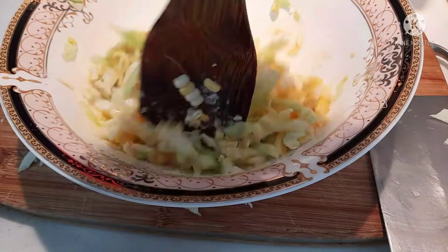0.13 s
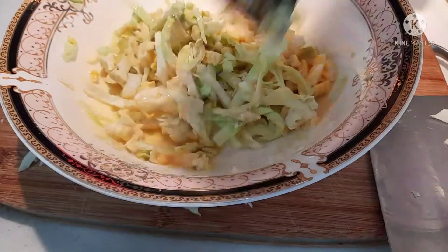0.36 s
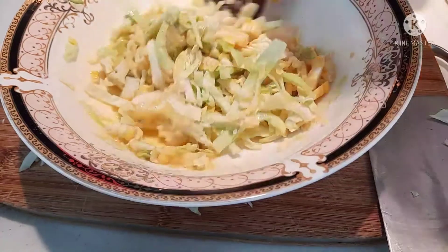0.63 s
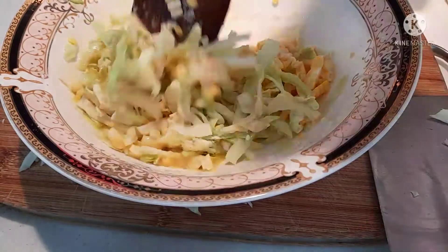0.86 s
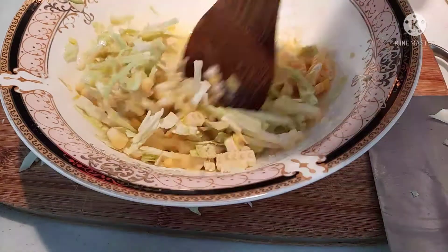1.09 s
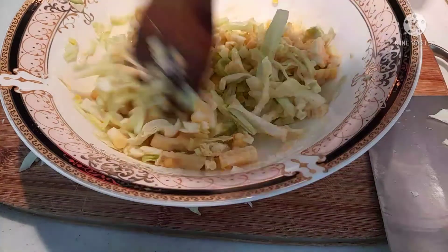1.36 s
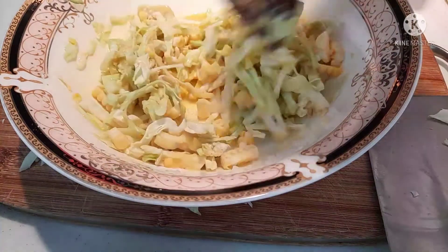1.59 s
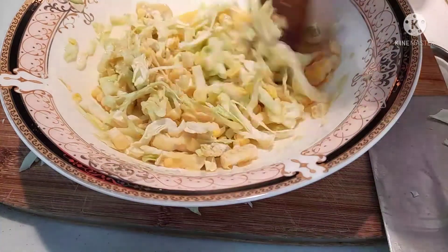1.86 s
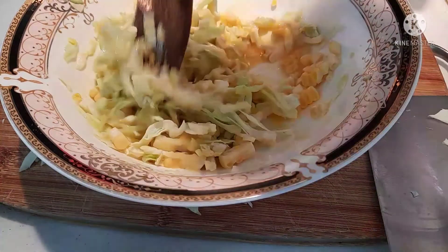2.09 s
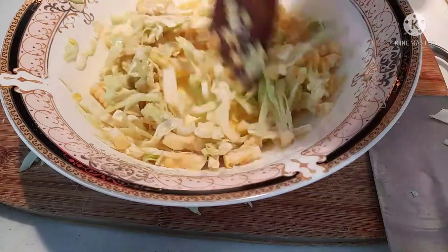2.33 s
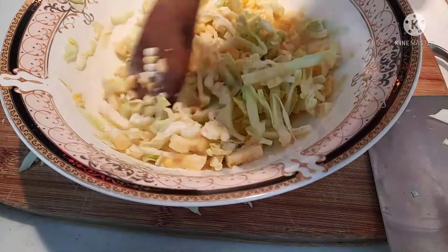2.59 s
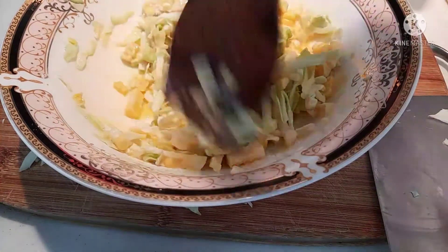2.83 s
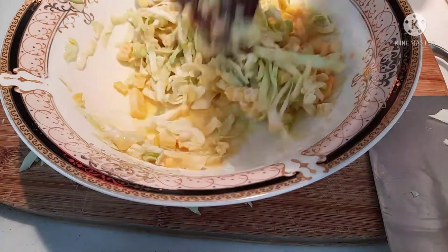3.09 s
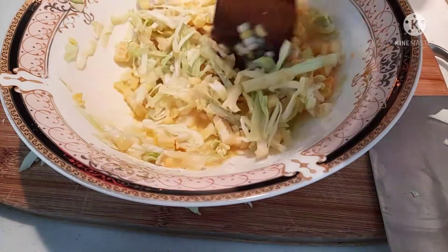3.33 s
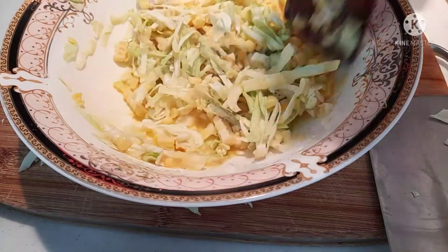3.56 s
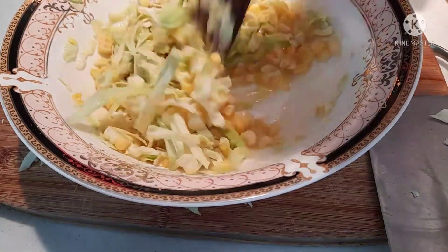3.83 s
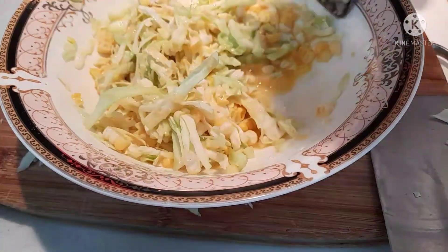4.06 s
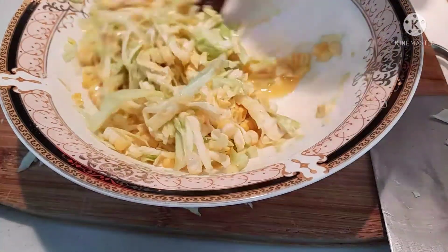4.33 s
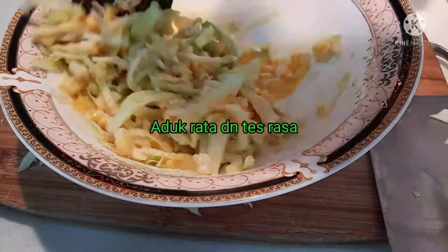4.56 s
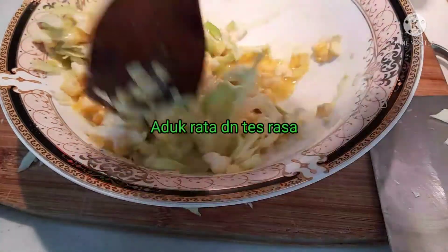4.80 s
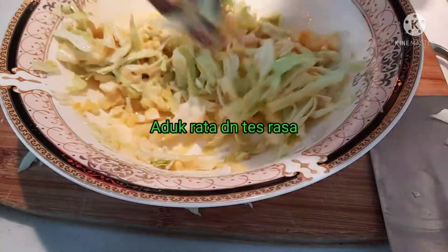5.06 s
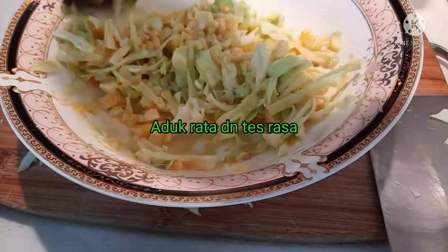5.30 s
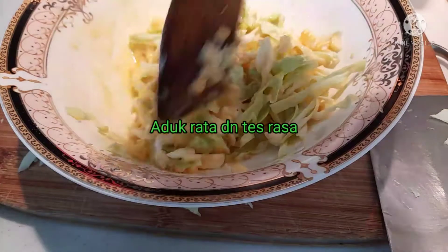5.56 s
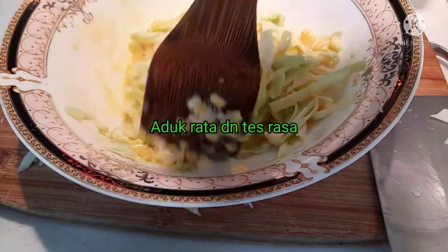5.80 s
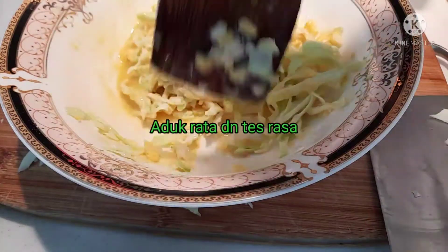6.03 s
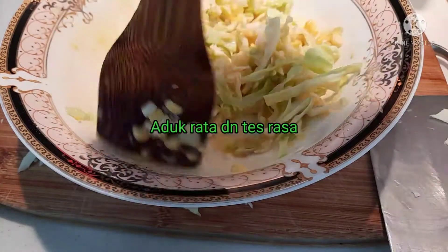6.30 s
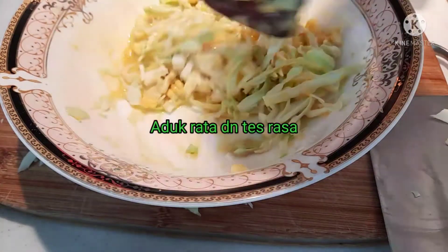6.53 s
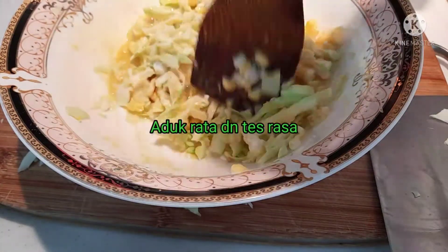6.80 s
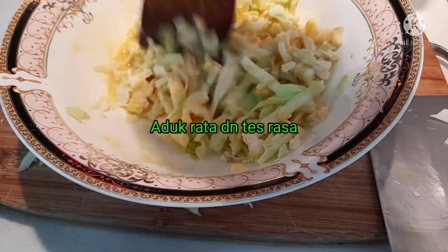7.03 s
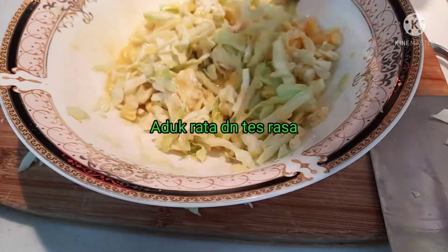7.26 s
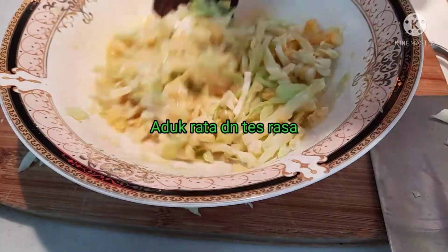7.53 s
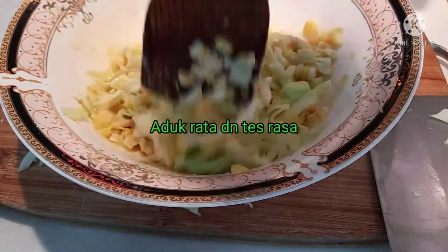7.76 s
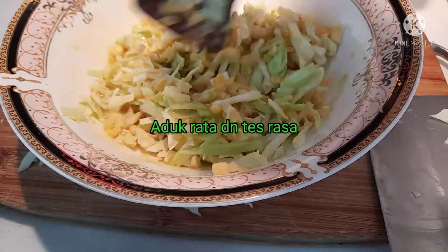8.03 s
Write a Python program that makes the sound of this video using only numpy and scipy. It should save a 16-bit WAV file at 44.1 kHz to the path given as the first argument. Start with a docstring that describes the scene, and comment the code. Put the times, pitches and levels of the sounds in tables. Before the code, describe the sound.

Wet shreds crunch and squelch in short swelling strokes, dense with tiny pops, slightly brighter on the right. A wooden utensil clacks on ceramic over a board, mostly softly, with a few hard knocks in the first half; later strokes are softer, with muffled low shoves. A faint low hum vanishes right at the start. Close microphone, small kitchen, short reverberation, low airy background.

```python
"""A wooden spatula knocks on a ceramic plate standing on a cutting board, as it folds cabbage and egg.
Each knock sums dying tones of wood, plate and board with short puffs of noise. Wet shreds crackle in
dense tiny pops that follow the strokes, single stems snap, and shoves and knocks thud low through board
and counter. A low hum fades early on; a small kitchen answers with random echoes over a steady rush of noise."""
import sys
import numpy as np
from scipy import signal
from scipy.fft import rfft, irfft
from scipy.io import wavfile
from scipy.ndimage import uniform_filter1d

SR = 44100
rng = np.random.default_rng(int(sys.argv[2]) if len(sys.argv) > 2 else 0)


def volts_from_db(level):
    """Convert decibel levels to linear amplitude ratios."""
    exponent = np.asarray(level, float) / 20
    return 10 ** exponent


def store_pcm(level_fs):
    """Save levels as 16-bit WAV."""
    pcm = np.round(np.clip(level_fs, -1, 1) * 32767).astype(np.int16)
    wavfile.write(sys.argv[1], SR, np.atleast_2d(pcm).T)


N = 358974  # samples
RING_T = np.arange(SR // 3) / SR  # time axis of one ringing blow [s]


def evened(x):
    """Scales a signal to an rms of one."""
    return x / np.sqrt(np.mean(x ** 2) + 1e-20)


def smoothed(x, first, second):
    """Two running averages along the last axis."""
    return uniform_filter1d(uniform_filter1d(x, size=first), size=second)


def read(points, hz):
    """Reads a curve at any frequency, on a logarithmic frequency axis."""
    f, value = np.transpose(points)
    return np.interp(np.log(hz + 1), np.log(f + 1), value)


def add(mix, s, sound, peak_db, pan_db):
    """Adds a sound at s seconds, its mid signal scaled to the peak; positive pan_db favours the left."""
    part = mix[:, round(s * SR):][:, :sound.shape[1]]
    sides_db = peak_db + np.array([[.5], [-.5]]) * pan_db
    scaled = sound / abs(sound.mean(0)).max() * volts_from_db(sides_db)
    part += scaled[:, :part.shape[1]]


def ring(modes, weight_db, rise, detune=1):
    """Dying sines of one object, in step as the blow peaks; each has its own phase in each channel."""
    hz, db, t60, lead = np.transpose(modes)[:, :, None]
    size = volts_from_db(db + weight_db(hz) - 60 * RING_T / t60)
    turn = 2 * np.pi * hz * detune * (RING_T - rise)
    sound = [(size * np.sin(turn + side * lead)).sum(0) for side in (-.5, .5)]
    return np.array(sound) * (1 - np.exp(-(RING_T / rise) ** 2))


def burst(centre_hz, octaves, decay, noise):
    """A short puff of noise around one pitch, partly shared by the channels."""
    hz = np.fft.rfftfreq(noise.shape[1], 1 / SR)
    shared = noise[1:] + 1.12 * noise[0]
    bell = np.exp(-.5 * (np.log2((hz + 1) / centre_hz) / octaves) ** 2)
    return irfft(rfft(shared) * bell) * np.exp(-np.arange(noise.shape[1]) / SR / decay)


# spatula meets plate: (time [s], peak level [dB], board boom re peak [dB], plate ring re peak [dB],
# best-woken plate pitch [Hz], clack centre above 1 kHz [octaves])
KNOCKS = [(.398, -47, -10, -20, 1100, .67), (.581, -32, 2.5, -7, 2150, 1.02),
          (.688, -28.5, 3.5, -28, 2080, -.16), (1.1345, -12.5, -10.5, -20, 1130, .22),
          (1.468, -44, 0, -25, 1130, .1), (1.893, -36, -2, -25, 1130, -.2),
          (2.9224, -15, -8, -12, 2300, .55), (3.331, -2.5, -13, -30, 1780, .71),
          (3.6155, -20, -3, -16, 2870, 1.12), (3.911, -45.5, -3, -1, 1130, 1.1),
          (4.135, -24, -7, -10, 2430, 1.4), (4.187, -48, 6, -3, 4500, .49), (4.222, -38, -8, -5, 3700, 2.2),
          (4.306, -25.5, -2.5, -40.5, 1074, -.26), (5.312, -25.5, 3, -18, 1280, .52),
          (5.85, -51, -1.5, -17.5, 1067, .62), (6.198, -21.5, -5, -22, 1800, .69),
          (6.316, -52, -7, -1.5, 4600, .4), (7.423, -36, 1.5, -23, 2080, .5),
          (7.467, -34, 2.5, -5, 3500, -.3)]
# ringing modes of the plate, the wooden spatula and the board, before each blow reshapes them:
# (frequency [Hz], relative level [dB], time to fall 60 dB [s], phase by which left lags [rad])
PLATE = [(445, -6, .15, .3), (1134, -2, .35, .6), (2073, 0, .4, 0), (2122, -8, .2, .4), (3210, 0, .13, -.6),
         (4520, -5, .09, 1), (4690, -12, .15, 1.3), (5835, -8, .12, .6), (7770, -11, .06, -.9),
         (9900, -11, .05, .7)]
WOOD = [(638, -4, .028, 1), (796, 0, .028, .8), (905, 0, .022, -1), (990, -3, .02, .5),
        (1240, -10, .015, -.12), (1530, 0, .014, -.35), (1760, -6, .012, .89), (2000, -1, .02, -.37),
        (2658, 0, .014, .51), (3050, -3, .01, -.5), (3615, -2, .01, -1)]
BOARD = [(58.3, -5, 0.25, -0.22), (66.8, -5.5, 0.24, .03), (78, 1.5, 0.24, 0.13), (100, -3.5, 0.19, .1),
         (121, 3.5, 0.21, 0.23), (155.6, -6, 0.24, 0.36), (181, 3.5, 0.11, .2), (297.6, -4.5, 0.2, 0.47),
         (334, 6.5, 0.075, .4), (424, -3, 0.11, 0.47), (496, -3.5, 0.15, 1)]
# the bright first touch of wood on glaze: base level re peak [dB], base centre [Hz], decay [s]
CRACK_DB, CRACK_HZ, CRACK_S = -6, 2900, .0015


def knocks():
    """Each blow clacks the wood, rattles plate on board, rings the ceramic and booms in the board."""
    out = np.zeros((2, N))
    grip = rng.standard_normal((len(KNOCKS), 2, len(WOOD), 1))  # hand and point of contact change
    rattles = rng.standard_normal((len(KNOCKS), 3, 8192))
    for knock, (spot, shift), noise, (waver_db, slip) in zip(KNOCKS, grip, rattles, rocking(len(KNOCKS))):
        s, db, boom_db, ring_db, best_hz, octave = knock

        def clack_db(hz):
            # the time of contact cuts the modes above the centre steeply
            steepness = np.where(hz > 1000 * 2 ** octave, 18, 6)
            return 2.5 * spot - steepness * (np.log2(hz / 1000) - octave) ** 2

        def plate_db(hz):
            return .7 * waver_db[:len(PLATE)] - 13 * abs(np.log2(hz / best_hz))

        def boom_weight_db(hz):
            return waver_db - 30 * (hz < 230)  # the deepest modes hardly sound in this boom

        add(out, s, ring(WOOD, clack_db, .0014, 1 + .03 * shift), db, -3.5)
        rattle = burst(800 * 2 ** octave, 0.68, 0.01, noise)
        add(out, s + 0.002092, rattle, db - 10, -2.5)

        # stronger when the plate rings free, weaker when the clack is low
        crack_db = CRACK_DB + .55 * ring_db + 12 * min(octave - .5, 0)
        crack = burst(CRACK_HZ * 2 ** (.4 * octave), .45, CRACK_S, noise[:, ::-1])
        add(out, s + .0008, crack, db + crack_db, -3)

        free = np.clip(volts_from_db(.5 * (ring_db + 8)), .25, 1)  # a blow that rests on the plate chokes its ring
        plate = ring(PLATE * np.array([1, 1, free, 1]), plate_db, .0015)
        plate *= volts_from_db(-260 * np.maximum(RING_T - .09, 0))  # wood and food settle back on the ceramic
        add(out, s, plate, db + ring_db, -2.5)
        add(out, s, ring(BOARD, boom_weight_db, 0.0028, slip), db + boom_db, -1.5)
    return out


# the board's uneven swell [dB rms before the last smoothing], its smoothing [s], detuning spread [ratio]
WAVER_DB, WAVER_S, SLIP = 3, .02, .03


def rocking(count):
    """The loose board rocks, so at each blow its modes swell unevenly in dB and shift slightly in pitch."""
    noise = rng.standard_normal((count, len(BOARD), len(RING_T) // 64 + 1))
    size = round(WAVER_S * SR / 64)
    swell = evened(smoothed(noise, size, size))
    smooth = uniform_filter1d(np.repeat(swell, 64, axis=2), size=128)[:, :, :len(RING_T)]
    return zip(WAVER_DB * smooth, 1 + SLIP * noise[:, :, :1])


# relative loudness of the pops by pitch: (frequency [Hz], level [dB per Hz])
CRACKLE = [(350, -43), (600, -27), (957, -4), (2200, 1), (3800, 0), (7730, -18), (11200, -3), (14000, 0),
           (16000, -8)]


def crackle(count=36):
    """Dense tiny pops of wet shreds, their size following the stroke; a few are large."""
    out, (squelch, level) = np.zeros((2, 2, N)), stirring()
    size = volts_from_db(3 * np.minimum(rng.exponential(1, N), 5))
    size *= rng.random(N) < 3500 / SR  # about 3500 pops a second
    size *= volts_from_db(2.8 * evened(smoothed(rng.standard_normal(N), 500, 400)))  # pops come in clumps
    kind = rng.integers(0, count, N)
    for k, hz in enumerate(np.geomspace(900, 15000, count)):
        pop = evened(burst(hz, 0.566, 0.00027 + 0.94 / hz, rng.standard_normal((3, 256))))
        gain = volts_from_db(read(CRACKLE, hz)) * np.sqrt(hz)
        pops = signal.oaconvolve((size * (kind == k))[None], pop, axes=1)[:, :N]
        out[int(k >= count // 2)] += gain * pops
    low, high = out / out[1].std()
    return (low * squelch + high * level) * volts_from_db(np.array([[-1], [5]]))  # stronger on the right


# strokes through the food, before the left-right tilt: (peak time [s], crackle level [dB],
# time to rise 20 dB [s], time to fall 20 dB [s], squelch of the lower band re crackle [dB])
STROKES = [(.065, -63, .09, .1, -6), (.225, -55.5, .14, .17, 3), (.4, -69, .1, .1, 1.5),
           (.69, -58, .09, .09, -2.5), (.9, -73, .6, .6, 4), (1.13, -48, .07, .025, 5),
           (1.2, -64, .1, .2, 3), (1.474, -47, .04, .085, .4), (1.899, -43, .08, .056, -4),
           (2.08, -69, .1, .09, 2.5), (2.25, -51, .08, .05, 5), (2.6, -61, .03, .1, .4),
           (2.645, -58, .08, .04, 3), (2.76, -64, .3, .025, 4), (2.985, -53, .03, .13, 3),
           (3.17, -70, .4, .12, 6), (3.3, -58, .03, .03, 1.5), (3.333, -50, .02, .04, 1.5),
           (3.725, -50, .06, .045, 1.5), (4.226, -52, .012, .035, -2.5), (4.31, -62, .15, .18, -1.5),
           (4.65, -75, .8, .5, 3), (4.915, -53.5, .07, .165, 2.5), (5.33, -61, .015, .2, .4),
           (5.6, -67, .9, .05, 2.5), (5.839, -63, .03, .15, 1.5), (5.95, -66, .2, .09, 2.5),
           (6.07, -68, .03, .17, 6), (6.3, -61.5, .035, .2, .4), (6.44, -63, .04, .1, -1.5),
           (6.52, -63, .15, .08, .4), (6.798, -49.5, .04, .075, -7), (7.125, -50, .045, .065, 2.5),
           (7.47, -57, .015, .13, .4), (7.7, -65, .14, .14, -2.5), (7.83, -73, .3, .1, -2.5),
           (7.93, -51, .07, .11, 4)]
ROUND = 1.15  # above 1 a stroke holds near its peak before it drops
# the heap keeps rustling after a stroke: level re peak [dB], time to fall 20 dB [s]
SETTLE_DB, SETTLE_S = -21, .25
# a blow shakes the food: base level re knock [dB], share of plate ring added [dB per dB],
# time to fall 20 dB [s], squelch re crackle [dB]; a dull, cushioned blow shakes it less [dB per octave]
JOLT_DB, JOLT_RING, JOLT_FALL_S, JOLT_SQUELCH_DB = -29, .45, .022, 9
JOLT_DULL_DB = 22


def stirring():
    """Levels of the squelch and crackle bands: every stroke swells, fades and settles; every knock jolts."""
    jolts = []
    for s, db, _, ring_db, _, octave in KNOCKS:
        jolt_db = db + JOLT_RING * ring_db + JOLT_DB + JOLT_DULL_DB * min(octave - .5, 0)
        jolts.append((s + .004, jolt_db, .004, JOLT_FALL_S, JOLT_SQUELCH_DB))
    t, power = np.arange(0, N + 64, 64) / SR, 0
    for s, db, rise, fall, squelch_db in STROKES + jolts:
        late = t - s
        swell = volts_from_db(db - 20 * np.where(late < 0, -late / rise, late / fall) ** ROUND)
        settle = (late > 0) * volts_from_db(db + SETTLE_DB - 20 * abs(late) / SETTLE_S)
        power = power + (swell ** 2 + settle ** 2) * volts_from_db(np.array([[2 * squelch_db], [0]]))
    return [np.interp(np.arange(N) / SR, t, np.sqrt(band)) for band in power]


# single stems snapping, and wet smacks: (time [s], peak level [dB], centre above 1 kHz [octaves])
SNAPS = [(0.2104, -39, 1.9), (0.2315, -37, 2.04), (0.5087, -50, 2.5), (0.7958, -44, 3.4),
         (0.9784, -45, 2.4), (1.1007, -38, 1.6), (1.132, -32, 1.8), (1.4446, -32, 2.1),
         (1.4681, -24.5, 2.74), (1.7374, -44.5, 3.8), (1.8932, -16, 2.7), (2.191, -40, 3.2),
         (2.21, -41, 2.5), (2.227, -36, 1.6), (2.2563, -30, 2.4), (2.293, -38, 1), (2.3013, -26, 2.6),
         (2.5913, -45, 3.3), (2.6163, -38, 2.2), (2.6805, -33, 0.73), (2.7047, -35, 2.5),
         (2.7571, -31, 3.9), (3.0435, -37, 3.9), (3.047, -40, 2.2), (3.306, -38, 1.7), (3.1643, -41, 2.2),
         (3.6584, -42.5, 2), (3.7118, -27, 2.08), (3.8626, -45, 2.7), (4.187, -39, 2.6), (4.468, -47, 2.3),
         (4.7006, -44, 1.35), (4.819, -45.5, 3.5), (4.8763, -44, 3.9), (4.897, -23.5, 1.72),
         (5.4236, -41, 3), (5.6125, -39.5, 1.3), (6.43, -45, 3.3), (6.5124, -36.5, 0.94), (6.777, -41, 2.4),
         (6.797, -29, 2.95), (7.0793, -46, 2.8), (7.095, -42, 1.7), (7.1146, -34, 1.53), (7.14, -35, 1.4),
         (7.4693, -30, 2.2), (7.5723, -33.5, 0.9), (7.792, -44, 2.7), (7.8601, -40, 2.04),
         (7.892, -39, 1.9), (7.922, -25, 1.2), (7.943, -35, 2.6), (7.964, -35, 0.6), (7.9988, -33, 0.9)]
# small stray snaps: middle level [dB], spread either way [dB], middle pitch above 1 kHz [octaves]
FAINT_DB, FAINT_SPREAD_DB, FAINT_OCTAVE = -49, 2.5, 2.8


def snaps(count=6):
    """A stem breaks: a wide click a millisecond or two long; a few faint ones fall by chance."""
    out = np.zeros((2, N))
    when, size, pitch = rng.random((count, 3)).T
    faint_db = FAINT_DB + FAINT_SPREAD_DB * (2 * size - 1)
    faint = np.transpose([when * (N - 1) / SR, faint_db, FAINT_OCTAVE + pitch - .5])
    rows = SNAPS + faint.tolist()
    for (s, db, octave), noise in zip(rows, rng.standard_normal((len(rows), 3, 512))):
        add(out, s, burst(1000 * 2 ** octave, .8, .0015, noise), db, -5.5)
    return out


# low thuds in board and counter, from shoves and from the weight of knocks:
# (time [s], peak level [dB], centre [Hz], deepest mode re peak, before a common 1.5 dB cut [dB])
THUDS = [(0.155, -44, 99.6, -31), (0.242, -41, 94, -6), (0.58, -43.5, 164, -6), (0.687, -28, 124, -22),
         (1.133, -22.5, 112, -7), (1.476, -36.5, 80, -4.5), (1.885, -31, 105, -11), (1.945, -42, 95, -6),
         (2.241, -38, 71, -8.5), (2.623, -41, 78, -5), (2.68, -42, 119, -1.5), (2.922, -32.5, 111, -9),
         (3.329, -18, 183, -5), (3.615, -26.5, 123, -24), (3.714, -31.5, 126, -7), (4.142, -30, 119, -13),
         (4.302, -30.5, 118, -12), (4.939, -29.5, 77, -7.5), (5.31, -26.5, 175, -21), (5.84, -44, 118, -3),
         (6.045, -21, 70, 2), (6.089, -27, 91.5, -8), (6.198, -27, 118, -17), (6.307, -40.5, 124, -0.5),
         (6.367, -39, 123, -20), (6.432, -40, 137, -9.5), (6.813, -35.5, 67.3, -9.5),
         (7.135, -31, 86, -6.5), (7.424, -39.5, 183, -21), (7.468, -36.5, 146, -16),
         (7.922, -43.5, 75.4, 5), (7.969, -35, 68, -8)]


def thuds():
    """A shove or knock wakes the board modes nearest the thud's centre, and the slow deepest one by its weight."""
    out = np.zeros((2, N))
    for (s, db, centre_hz, deep_db), (waver_db, slip) in zip(THUDS, rocking(len(THUDS))):
        def near_centre_db(hz):
            return waver_db[1:] - 7.5 * np.log2(hz / centre_hz) ** 2

        def deepest_db(hz):
            return .5 * waver_db[:1]

        add(out, s, ring(BOARD[1:], near_centre_db, 0.014, slip[1:]), db, -1.5)
        add(out, s, ring(BOARD[:1], deepest_db, 0.009, slip[:1]), db + deep_db - 1.5, -.6)
    return out


# a low hum that fades as the plate settles: (time [s], frequency [Hz], rms level [dB])
HUM = [(0.0, 100.1, -55), (0.33, 100, -56.5), (0.42, 108, -61)]


def hum():
    """A soft low sine gliding in pitch and level, the same in both channels, silent after its last row."""
    times = np.transpose(HUM)[0]
    s, hz, db = (np.interp(np.arange(N) / SR, times, column) for column in np.transpose(HUM))
    tone = np.sin(2 * np.pi * np.cumsum(hz) / SR)
    return np.sqrt(2) * volts_from_db(db) * tone * (np.arange(N) < s[-1] * SR)


# how long the kitchen echoes: (frequency [Hz], time to fall 60 dB [s])
KITCHEN = [(100, 0.91), (400, 0.47), (1100, 0.37), (3000, 0.23), (8000, 0.29)]


def kitchen(x, count=3):
    """Sparse taps of random sign dying band by band; several tails take turns."""
    out, turn = np.zeros((2, N)), np.arange(N) / SR * 1.7
    for k in range(count):
        taps = np.zeros((2, SR // 2))
        # one tap at a random place in every 20 samples
        at = np.arange(180, SR // 2 - 20, 20) + rng.integers(0, 20, (2, (SR // 2 - 181) // 20))
        np.put_along_axis(taps, at, rng.choice([-1., 1.], at.shape), 1)
        hz, t, z = signal.stft(taps, SR, nperseg=256)
        fade = volts_from_db(-60 * t / read(KITCHEN, hz)[:, None])
        tail = signal.istft(z * fade, SR, nperseg=256)[1]
        share = np.sqrt(2 / count) * np.cos(np.pi * (turn + k / count))
        out += signal.oaconvolve((x * share)[None], tail / np.linalg.norm(tail[0]), axes=1)[:, :N]
    return out


# relative spectrum of the steady rush: (frequency [Hz], level [dB per Hz])
RUSH = [(18, -50), (30, -16), (106, -1), (245, -11), (280, 0), (426, -10.5), (721, -15.5), (1190, -21.5),
        (1460, -11.5), (3490, -31.5), (16000, -39)]
RUSH_DB = -58  # rms level of the rush before its slight tilt to the right [dB]
# narrow bands in the rush: (frequency [Hz], width [Hz], boost [dB])
DRONES = [(304.4, 6, 0), (986, 78, 11)]
# how alike left and right are in the rush: (frequency [Hz], likeness [0 to 1])
SAME = [(60, 0.42), (300, 0.7), (700, 0.3), (1500, 0.05), (8000, 0.033)]


def rush():
    """Steady kitchen air: random spectra with faint drifting patches."""
    frames, hz = N // 512 + 5, np.fft.rfftfreq(2048, 1 / SR)
    a, b, c, d, patches = rng.standard_normal((frames, 1025, 5)).T
    patches = evened(uniform_filter1d(uniform_filter1d(patches, 14, 0), 10, 1))
    drones_db = sum(db * np.exp(-.5 * ((hz - f) / width) ** 2) for f, width, db in DRONES)
    same, left = read(SAME, hz)[:, None], a + 1j * b
    right = same * left + np.sqrt(1 - same ** 2) * (c + 1j * d)
    z = np.array([left, right]) * volts_from_db((read(RUSH, hz) + drones_db)[:, None] + 1.1 * patches)
    air = evened(signal.istft(z, nperseg=2048, noverlap=1536)[1][:, :N])
    return volts_from_db(RUSH_DB + np.array([[-.8], [.8]])) * air


def scene():
    """Blows and food feed the room; all nearby sounds reach the left channel a little late."""
    blows = knocks()
    food = snaps() + crackle()
    near = blows + food + thuds()
    near[0] = np.roll(near[0], 5)  # samples
    sent = volts_from_db(-11.5) * blows[1] + volts_from_db(-9.5) * food[1]
    return near + hum() + kitchen(sent) + rush()


def band_limit(x):
    """A steep low-pass at the top of the band."""
    return signal.sosfilt(signal.butter(12, 16650, fs=SR, output="sos"), x)


def record(dry):
    """The microphones lose the deepest bass and the top of the treble."""
    heard = signal.sosfilt(signal.butter(4, 45, "high", fs=SR, output="sos"), dry)
    heard = signal.sosfilt(signal.butter(8, 15900, fs=SR, output="sos"), heard)
    return band_limit(heard)


dry = scene()
out = record(dry)
store_pcm(out)
```